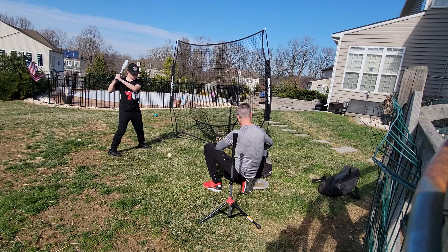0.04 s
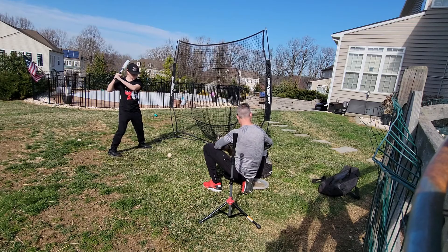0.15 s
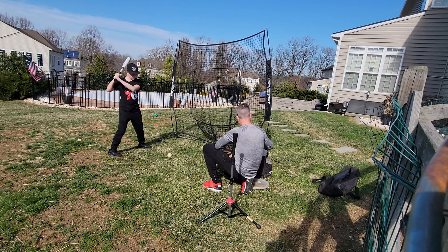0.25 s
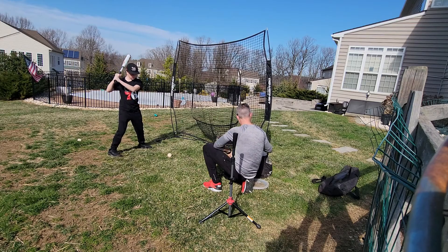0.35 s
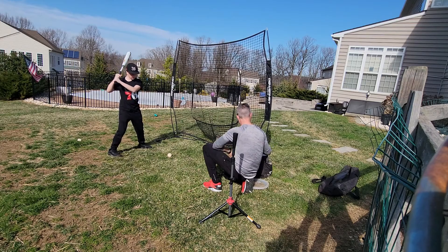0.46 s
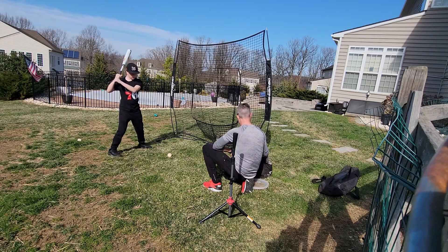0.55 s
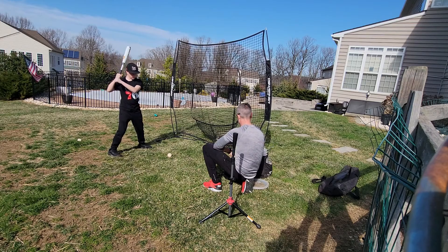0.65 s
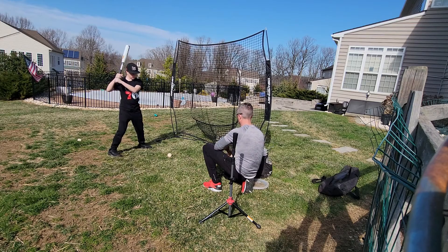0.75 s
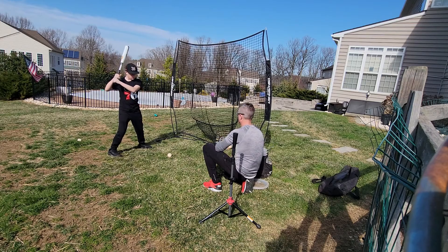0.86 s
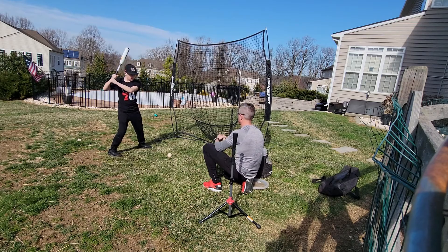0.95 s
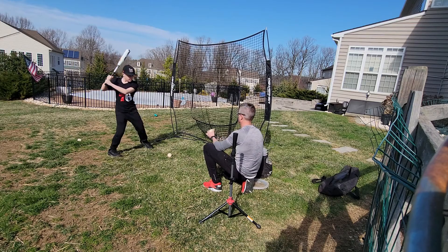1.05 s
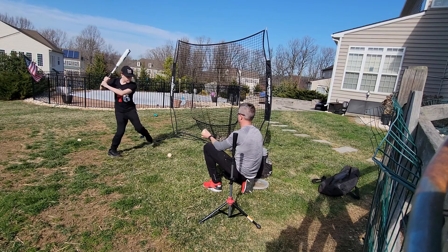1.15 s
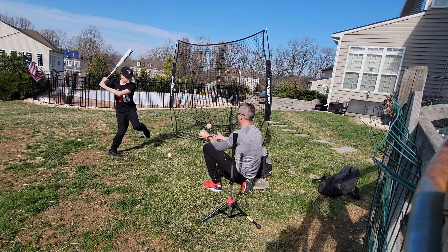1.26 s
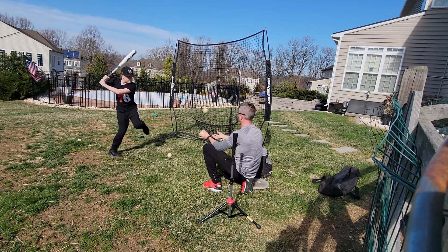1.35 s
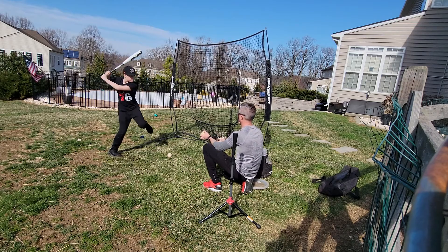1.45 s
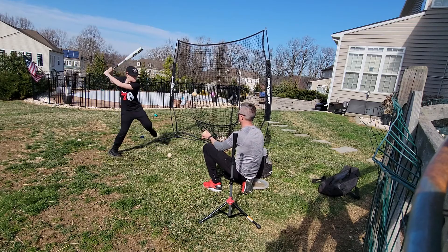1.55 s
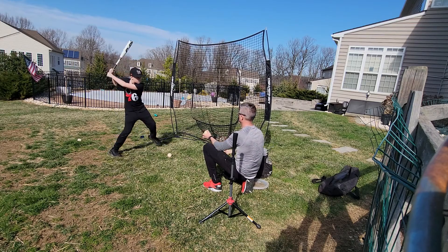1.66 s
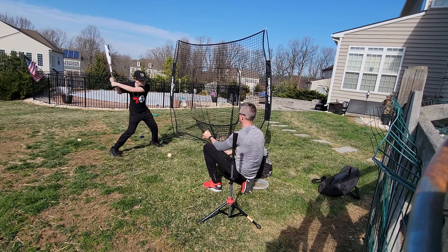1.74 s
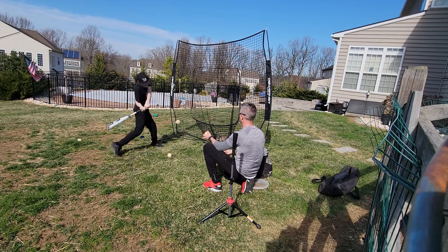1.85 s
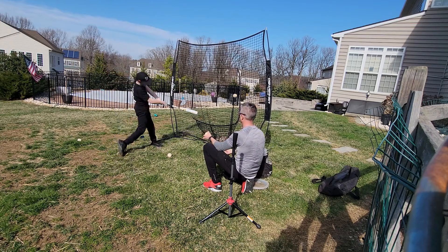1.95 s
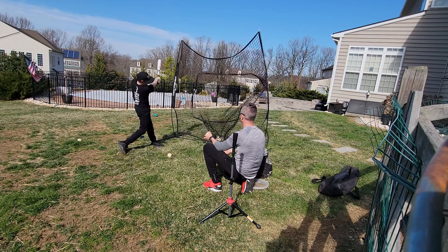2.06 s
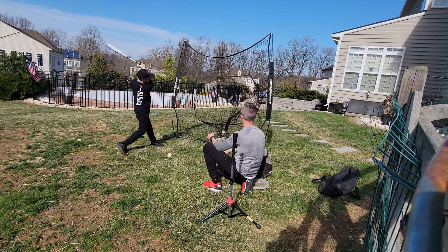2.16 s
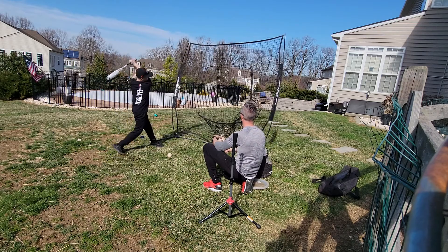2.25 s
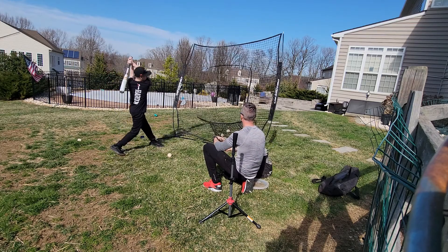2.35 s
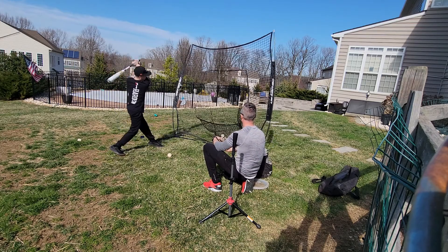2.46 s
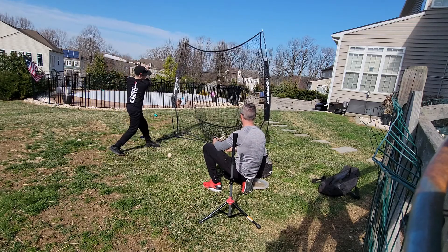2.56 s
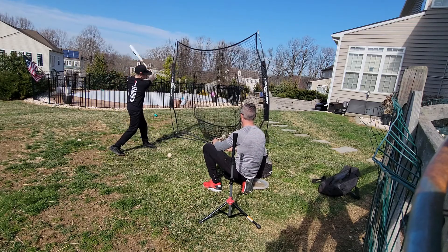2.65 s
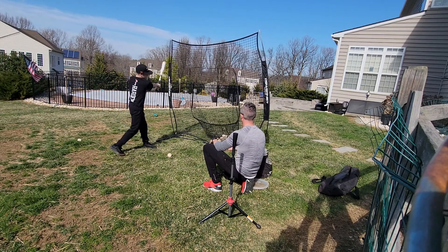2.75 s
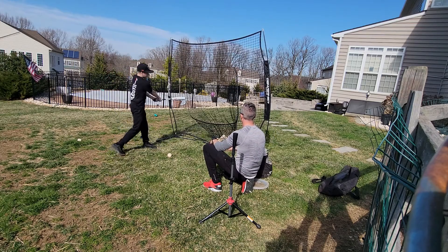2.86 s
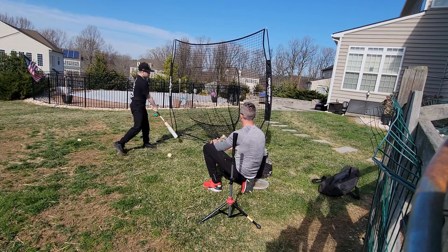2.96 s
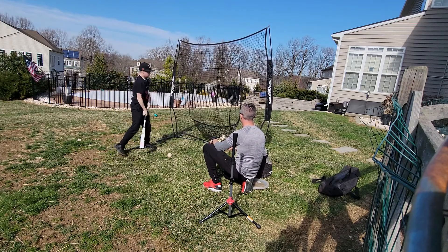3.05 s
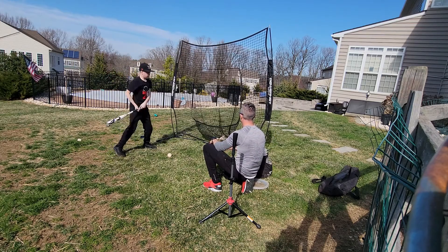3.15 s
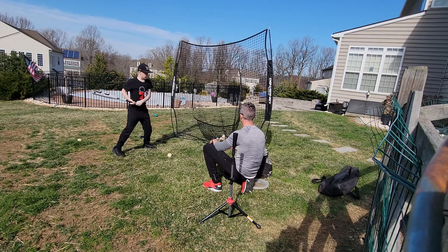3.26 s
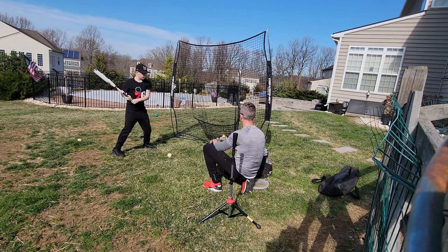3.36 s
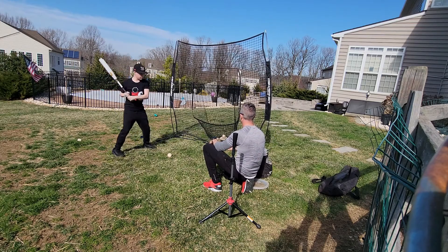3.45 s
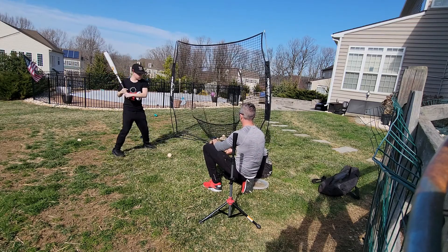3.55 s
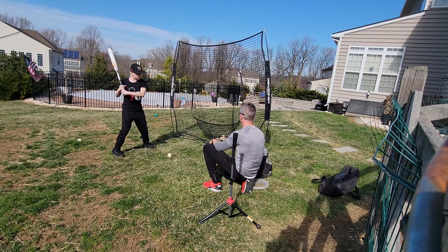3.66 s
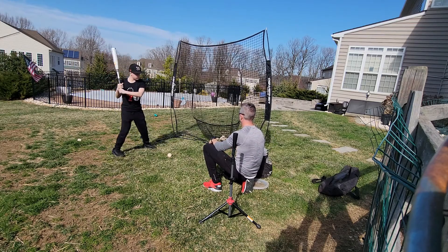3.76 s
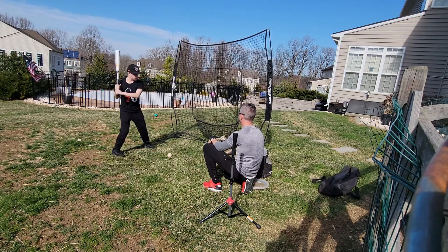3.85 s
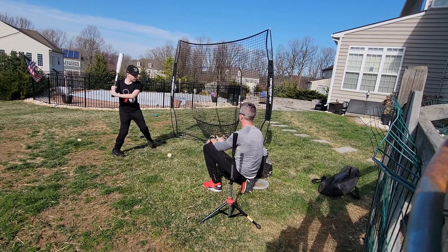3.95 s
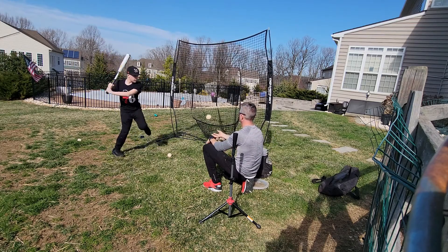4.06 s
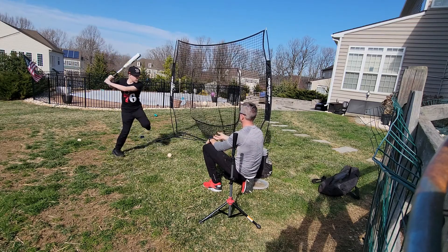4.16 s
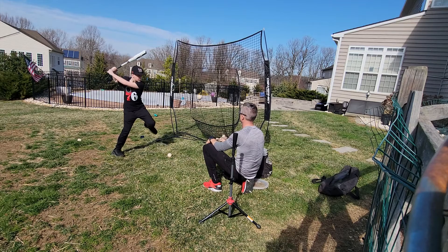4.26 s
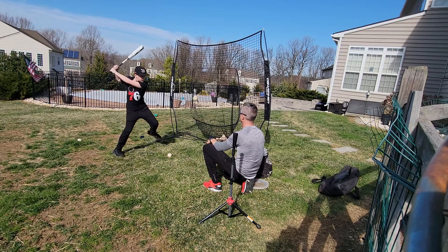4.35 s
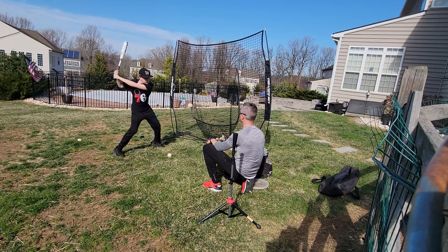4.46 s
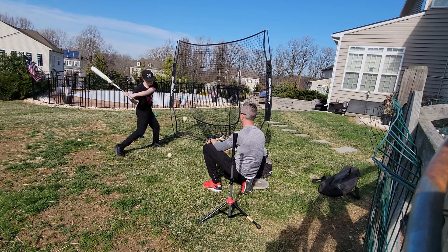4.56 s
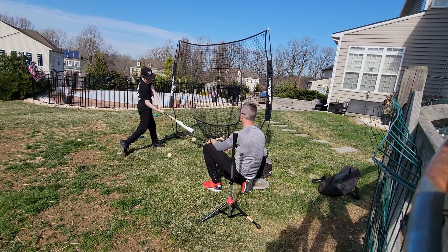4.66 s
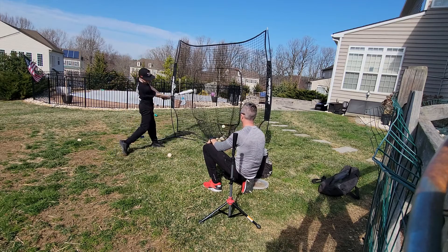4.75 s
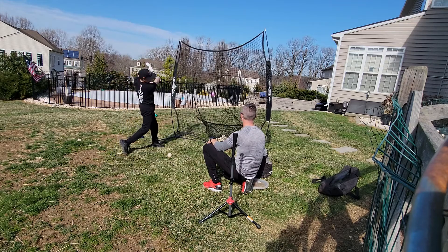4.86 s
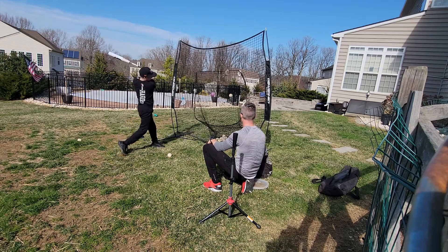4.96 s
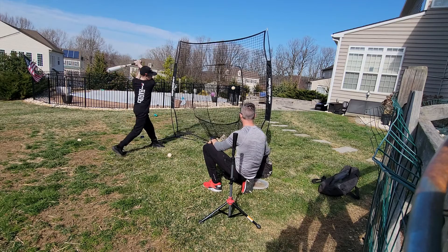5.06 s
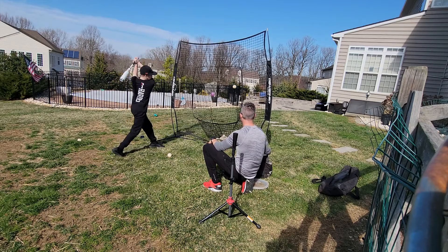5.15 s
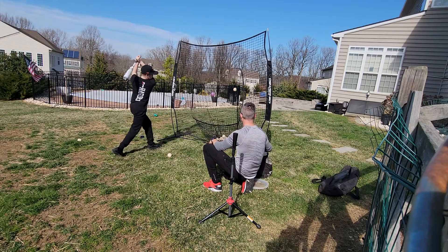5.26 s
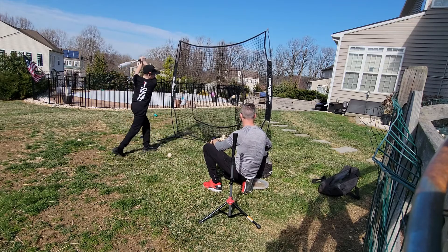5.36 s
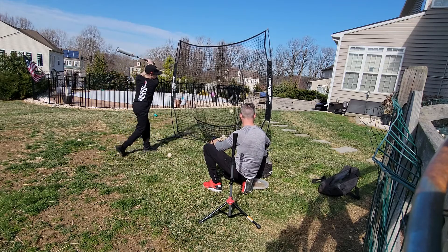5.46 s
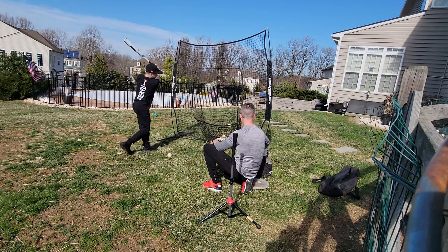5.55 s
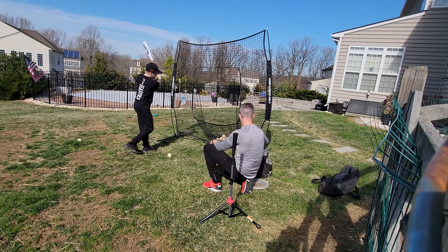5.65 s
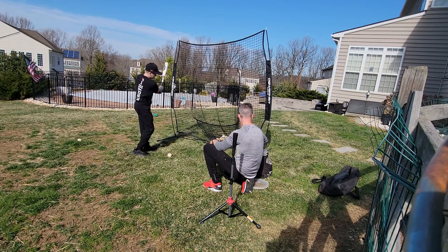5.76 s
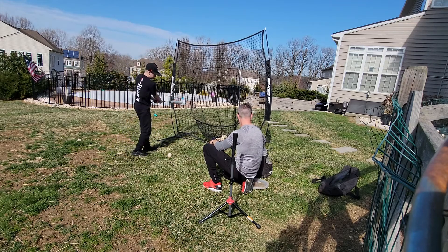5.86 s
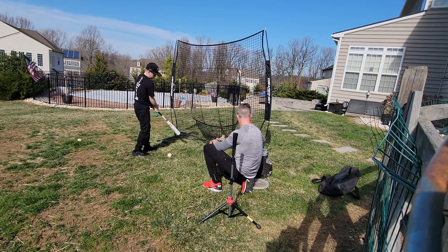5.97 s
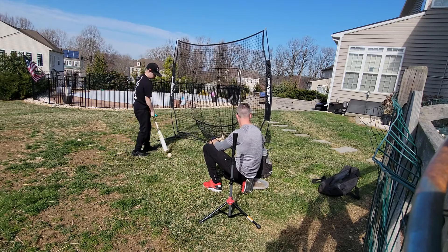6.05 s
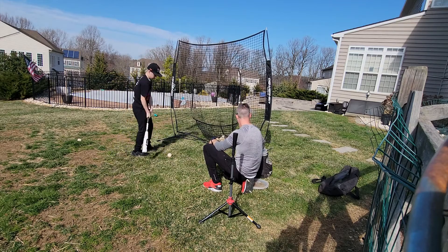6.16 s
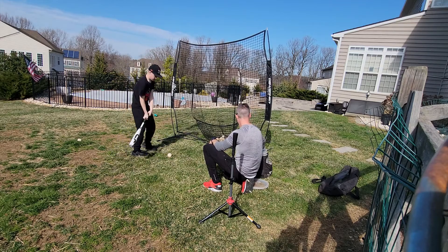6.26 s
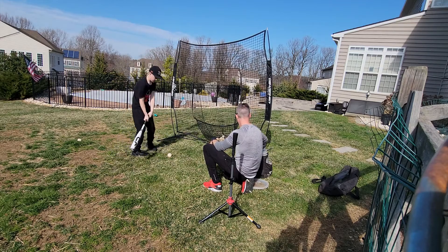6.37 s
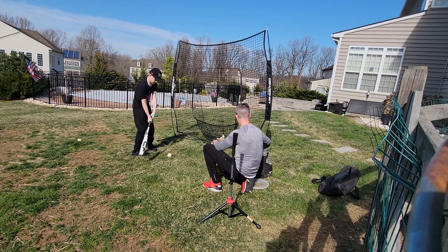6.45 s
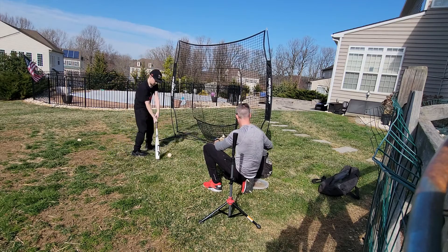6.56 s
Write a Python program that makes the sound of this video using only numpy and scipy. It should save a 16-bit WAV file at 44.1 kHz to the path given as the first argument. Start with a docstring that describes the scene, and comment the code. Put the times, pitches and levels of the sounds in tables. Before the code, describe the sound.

In a quiet backyard, a metal bat pings loudly twice, balls slap into a net, and a small bird whistles steadily behind.

```python
"""In a backyard a hollow metal bat strikes two balls into a practice net.
Each blow is a shaped click, a damped thump and ringing barrel modes that drop as the barrel turns away.
Damped sines knock the net frame, coloured noise swishes the mesh, delays and sparse taps echo the yard.
Gliding sines make a repeated falling whistle and twitters; filtered noise and a wavering sine
make the far traffic and engine, with rustles, ticks and thuds between."""
import sys
import numpy as np
from scipy import signal
from scipy.fft import rfft, irfft
from scipy.io import wavfile
from scipy.ndimage import uniform_filter1d

SR = 44100
rng = np.random.default_rng(int(sys.argv[2]) if len(sys.argv) > 2 else 0)


def wrap_up_sound(samples):
    """Save the sound to the file named by the first command line argument, as 16-bit audio."""
    columns = np.atleast_2d(samples).T
    # keep every value between -1 and 1, then stretch to whole-number steps
    tamed = np.clip(columns, -1, 1)
    steps = np.round(tamed * 32767).astype(np.int16)
    wavfile.write(sys.argv[1], SR, steps)


N = 291496

# Air and far traffic spectrum. Each row: frequency in Hz, relative level in dB per Hz.
AIR_COLOUR = [(12, -39), (30, -10.5), (70, 0.5), (111, -5), (160, -14.5), (300, -17.5), (994, -21),
              (1500, -29.5), (2310, -29.5), (4150, -36), (4700, -47), (7200, -49), (8300, -67),
              (15200, -72), (16500, -77)]
# Air, left-right likeness. Each row: frequency in Hz, correlation (-1 to 1).
AIR_SAME = [(60, 0.63), (130, 0.99), (290, 0.051), (640, -0.55), (1410, -0.53), (3100, -0.11),
            (6820, -0.01), (15000, -0.23)]
# Air balance. Each row: frequency in Hz, left over right in dB.
AIR_BALANCE = [(60, -1.5), (180, -3.5), (550, -1.5), (1650, -6), (4970, 0.5), (15000, 15.5)]
AIR_DB = -51
# Far engine. Each row: time in seconds, mean pitch in Hz, mean level in dB.
ENGINE = [(0, 70.9, -69), (1.401, 74.6, -59), (2.6, 94.8, -73), (3.7, 109.8, -57), (4.4, 122.6, -55),
          (5.5, 124.3, -54), (6.61, 130.8, -51)]

# Whistle onsets. Each row: onset in seconds, level in dB.
WHISTLE_ONSETS = [(.111, -56), (.394, -59), (.677, -58), (.965, -56), (1.256, -56), (1.551, -55.5),
                  (1.844, -55.5), (2.136, -53), (2.43, -56.5), (2.715, -55), (3.012, -54), (3.302, -56),
                  (3.595, -56), (3.89, -55), (4.186, -56), (4.473, -56.5), (5.072, -56), (5.373, -57),
                  (5.66, -55), (5.963, -54.5), (6.265, -57)]
# One whistle's glide. Each row: seconds from onset, nominal pitch in Hz, relative level in dB.
WHISTLE_GLIDE = [(-.013, 4150, -22), (-.010, 3550, -10), (-.006, 2720, -7), (-.001, 2440, -1.5),
                 (.011, 2230, -.5), (.027, 1990, -3.5), (.043, 1850, -8), (.065, 1810, -21)]
# Twitter phrases. Each row: start in seconds, number of strokes, top pitch in Hz, middle level in dB.
PHRASES = [(1.088, 1, 5460, -72), (1.172, 1, 5200, -73), (1.197, 2, 4650, -69), (1.427, 1, 4800, -67),
           (1.464, 2, 4740, -68), (1.648, 2, 4780, -61.5), (1.704, 3, 4870, -62.5), (1.745, 1, 5370, -67),
           (3.1, 1, 4650, -61.5), (3.18, 1, 4650, -66), (3.792, 1, 4920, -61.5), (3.817, 1, 4580, -64),
           (5.145, 1, 5000, -57), (5.71, 1, 4390, -65), (5.948, 1, 5170, -65), (5.972, 1, 5430, -60.5),
           (6.018, 3, 5070, -57), (6.158, 3, 5450, -60.5), (6.228, 3, 5300, -63)]
STROKE_S, STROKE_STEP_S, STROKE_FALL_HZ = .012, .0089, 2000
OUTER_DB = -3  # per stroke away from the phrase's middle
# Level peeps. Each row: start in seconds, pitch in Hz, level in dB.
PEEPS = [(2.249, 3380, -57.5), (2.69, 6000, -69), (3.77, 3370, -67), (4.02, 5800, -67), (4.078, 7100, -74),
         (6.21, 4100, -57)]
PEEP_S = .015
# Near echoes of the birds. Each row: delay in seconds, level in dB.
HEDGE = [(.009, -11), (.021, -10), (.038, -13.5)]
# Phase of left over right for the birds. Each row: frequency in Hz, lead in radians.
BIRD_LEAD = [(0, 0), (2000, 1.6), (5000, -1.3)]

# Cloth, grass and mesh rustles. Each row: middle in seconds, length in seconds, level above 13 kHz in dB.
RUSTLES = [(0.12, 0.15, -77.5), (.42, 0.35, -88), (0.665, 0.1, -84), (1.127, .1, -86), (1.495, .04, -91),
           (1.74, 0.049, -78), (1.89, 0.35, -77), (2.347, .05, -74), (2.4, 0.14, -86), (2.51, 0.066, -81),
           (2.614, 0.38, -79), (3.02, 0.38, -87), (3.95, .1, -87), (4.494, 0.054, -75), (4.69, 0.12, -65),
           (5.13, .08, -76), (5.296, 0.17, -70), (5.384, 0.14, -76), (5.612, .05, -83), (5.68, .05, -80),
           (5.785, 0.054, -71.5), (5.87, 0.068, -81), (6.166, .05, -82), (6.244, 0.24, -78.5),
           (6.33, .03, -81), (6.592, 0.041, -74.5)]
# Rustle spectrum. Each row: frequency in Hz, relative level in dB per Hz.
RUSTLE_COLOUR = [(300, 15), (1000, -2.5), (3000, 5), (5500, -0.5), (7500, -3.5), (8500, -16.5),
                 (11300, -15.5), (12500, -9), (15000, -4.5), (16500, -3)]
# Rustle likeness: frequency in Hz, correlation. Rustle balance: frequency in Hz, left over right in dB.
RUSTLE_SAME, RUSTLE_BALANCE = [(300, .3), (3000, -.019)], [(300, -1.54), (15000, 1.5)]
RUSTLE_EDGE_DB = -14.5  # fall at a rustle's ends
STIR_DB, STIR_SWING_DB = -100, 7.5  # faint stirring under the rustles

# Dry ticks. Each row: start in seconds, level in dB, centre in Hz, t60 in seconds.
TICKS = [(1.64, -46, 2200, 0.067), (1.836, -76, 7600, .03), (2.011, -17.5, 2560, 0.057),
         (2.295, -58, 3640, .02), (2.322, -61, 4200, .02), (2.356, -64, 6860, 0.026),
         (2.639, -47, 1880, 0.07), (4.02, -42, 1810, 0.043), (4.373, -49, 3560, 0.028),
         (4.489, -63.5, 6000, 0.032), (5.108, -58, 4900, 0.029), (5.264, -47, 3600, 0.034),
         (5.689, -66, 5800, 0.031), (6.155, -77, 8000, .03), (6.327, -74, 9000, 0.021),
         (6.588, -62.5, 7940, 0.037)]
# Soft thuds on the lawn. Each row: start in seconds, level in dB, pitch in Hz, t60 in seconds.
THUDS = [(.22, -38, 215, 0.061), (2.507, -38, 104, 0.18), (5.298, -43.5, 203.5, 0.18),
         (5.342, -39, 120.7, 0.098), (5.695, -32, 223, 0.066), (5.696, -35.5, 111, 0.17),
         (5.996, -46.5, 231, 0.16)]

# Ball into the net. Each row: start in seconds, frame knock in dB, mesh swish in dB, swish t60 in seconds.
CATCHES = [(2.008, -43, -35, 0.32), (2.044, -52, -60, .3), (4.7514, -14.5, -21, 0.18),
           (4.7545, -12.5, -27.5, 0.092), (4.7612, -23, -31.5, 0.43), (4.776, -36, -26, 0.075)]
# Swish and knock-click spectrum. Each row: frequency in Hz, relative level in dB per Hz.
SWISH_COLOUR = [(35, -35), (60, -8), (342, -9), (442, -17.5), (600, -2), (874, -10), (1010, -7.5),
                (2460, -6), (9840, -32.5), (15000, -33), (16500, -35.5)]
# Mesh likeness. Each row: frequency in Hz, correlation.
MESH_SAME = [(100, -.051), (600, -.25), (2000, -.54), (8000, .23)]
# Mesh balance. Each row: frequency in Hz, left over right in dB.
MESH_BALANCE = [(100, -11.0), (10000, 3.0)]
# Frame pole modes. Each row: frequency in Hz, relative level in dB, t60 in seconds.
FRAME_MODES = [(249, -20, 0.064), (344.6, -20.5, 0.17), (546, -13.5, 0.121), (593, -15, 0.16),
               (790, -4, 0.041), (1011, -6.5, 0.071), (1120, 0.5, 0.044), (1313, -5, 0.031),
               (1550, -15.5, 0.14), (1940, -17.5, 0.048), (2460, -20, 0.021), (4500, -17, 0.015)]
# Phase of left over right for the frame. Each row: frequency in Hz, lead in radians.
FRAME_LEAD = [(0, -4.4), (300, 1.24), (1000, 0.77), (2330, 0.5), (3010, 5), (4390, 0), (16600, -4)]

# Yard reverberation. Each row: frequency in Hz, t60 in seconds.
YARD_T60 = [(100, 0.74), (500, 0.37), (1500, 0.34), (4000, 0.49), (9000, 0.33), (16000, 1)]
# Flat walls. Each row: delay in seconds, echo level in dB.
WALLS = [(.027, -24), (.061, -34), (.096, -38), (0.111, -34)]
# Scattered crack spectrum. Each row: frequency in Hz, relative level in dB per Hz.
SCATTER_COLOUR = [(60, -14), (300, 10.5), (900, 1), (2500, -1), (4000, -0.5), (6000, -14.5), (9000, -26.5),
                  (15000, -17), (16500, -32)]
# Scatter likeness. Each row: frequency in Hz, correlation.
SCATTER_SAME = [(100, .0042), (600, -.62), (3000, .26), (8000, .097)]
# Scatter balance. Each row: frequency in Hz, left over right in dB.
SCATTER_BALANCE = [(100, -5.0), (10000, 9.5)]
LUMPS_DB = -.5  # unevenness of the slaps
CLATTER_PER_S, CLATTER_DB, CLATTER_T60_S = 140, -21, .44  # pings from posts, slats and corners

# Bat on ball. Each row: contact in seconds, crack in dB, ball thump in dB, upper modes in dB,
# scattered crack in dB, factor on the upper modes' t60, slow overtone in dB, left over right in dB.
BLOWS = [(1.949, -9.5, -7.5, -9.5, -25, 0.28, -59, 0.3), (4.7021, -20.5, -10.5, -4, -24.5, 1.05, -49, 2)]
# Barrel after each blow. Each row: facing ring in dB, seconds from contact to turned away,
# cross ring's glance in dB, lingering ring in dB.
SWINGS = [(-8.5, 0.052, -34, -48), (-8.5, 0.049, -35, -53)]
# Crack spectrum. Each row: frequency in Hz, relative level in dB per Hz.
CRACK_COLOUR = [(35, -55), (60, -25.5), (1010, 9), (1470, -32), (2090, -26), (3260, 6.5), (3840, -5),
                (5470, -10.5), (7600, -46), (11300, -15), (16500, -23.5)]
# Squashed ball. Each row: frequency in Hz, relative level in dB, t60 in seconds.
THUMP_MODES = [(830, -7, 0.039), (1024, -0.5, 0.013)]
# Upper barrel modes. Each row: frequency in Hz, relative level in dB, t60 in seconds before the blow's factor.
UPPER_MODES = [(552, -15.5, 0.072), (2450, -20.5, 0.04), (2546, -9, 0.19), (3176, -23.5, 0.57),
               (3440, -27, 0.088), (3888, -10.5, 0.037), (3965, -23, 0.026), (5020, -23, 0.027)]
# Phase of left over right for the bat. Each row: frequency in Hz, lead in radians.
BAT_LEAD = [(0, 0.3), (250, 0.8), (600, 2.1), (1370, 2.3), (2540, 1.9), (3900, 3.9), (5430, 6.7),
            (16600, 8.5)]
BARREL_HZ, CROSS_HZ, SLOW_HZ = 1371, 1480, 2705
THUMP_LATE_S, UPPER_LATE_S = .001, .0008
BARREL_T60_S, SNAP_T60_S, SLOW_T60_S = .71, .06, 1.49
TURN_DB, TURN_POWER = -10, 9.8  # fall at the turn, and how abrupt it is
GLANCE_S, GLANCE_HALF_WIDTH_S, GLANCE_LEAD_RAD = .077, .02, .6
AWAY_DB, AWAY_T60_S, LINGER_T60_S, CROSS_LINGER_DB = -35, .11, 2.32, 0  # heard from behind


def gain_of(db):
    """Decibels to an amplitude factor."""
    return 10 ** (np.asarray(db) / 20)


def evened(x):
    """Scales to rms 1."""
    return x / np.sqrt(np.mean(x ** 2) + 1e-20)


def read(points, hz):
    """Interpolates a (Hz, value) table on a log-frequency axis."""
    f, value = np.transpose(points)
    return np.interp(np.log(hz + 1), np.log(f + 1), value)


def add(mix, start_s, sound):
    """Mixes a sound in at a time, cut off at the end of the mix."""
    part = mix[..., round(start_s * SR):][..., :sound.shape[-1]]
    part += sound[..., :part.shape[-1]]


def high_pass(x, hz, order):
    """Butterworth low cut."""
    return signal.lfilter(*signal.butter(order, hz, "high", fs=SR), x)


def smooth_twice(x, size, axis=-1):
    """Two running means, a near-triangular smoothing."""
    return uniform_filter1d(uniform_filter1d(x, size=size, axis=axis), size=size, axis=axis)


def wander(width):
    """Slow random drift of rms 1, smoothed over width samples."""
    return evened(smooth_twice(rng.standard_normal(N), width))


def noise(colour, same, balance, size, patchy_db):
    """Two partly alike channels of coloured noise with drifting spectral patches, rms 1."""
    hop, hz = size // 4, np.fft.rfftfreq(size, 1 / SR)
    a, b, c, d, patches = rng.standard_normal((N // hop + 5, len(hz), 5)).T
    patches = uniform_filter1d(uniform_filter1d(patches, size=9, axis=0), size=9, axis=1)
    patches = evened(patches)
    same = np.clip(read(same, hz), -1, 1)[:, None]
    left = a + 1j * b
    right = same * left + np.sqrt(1 - same ** 2) * (c + 1j * d)
    half_db = read(balance, hz)[:, None] / 2
    level_db = read(colour, hz)[:, None] + np.array([half_db, -half_db]) + patchy_db * patches
    z = np.array([left, right]) * gain_of(level_db)
    return evened(signal.istft(z, nperseg=size, noverlap=size - hop)[1][:, :N])


def click(colour):
    """The causal (minimum-phase) pulse of a spectrum, peak 1."""
    log_gain = np.log(gain_of(read(colour, abs(np.fft.fftfreq(4096, 1 / SR)))))
    pulse = np.fft.ifft(np.exp(np.conj(signal.hilbert(log_gain)))).real[:2048]
    return pulse / abs(pulse).max()


def ring(modes):
    """Exponentially decaying sines struck together."""
    t = np.arange(SR // 2) / SR
    return sum(gain_of(db - 60 * t / t60_s) * np.sin(2 * np.pi * hz * t) for hz, db, t60_s in modes)


def ports(x, lead, pan_db):
    """One source on two microphone ports: a phase lead by frequency and a left-over-right balance."""
    half_rad = np.interp(np.fft.rfftfreq(N, 1 / SR), *np.transpose(lead)) / 2
    shifted = rfft(x) * np.exp(1j * np.array([half_rad, -half_rad]))
    return irfft(shifted, N) * gain_of([[pan_db / 2], [-pan_db / 2]])


def air():
    """Broad, bass-heavy noise of air and far traffic."""
    return gain_of(AIR_DB) * noise(AIR_COLOUR, AIR_SAME, AIR_BALANCE, size=2048, patchy_db=1.5)


def drone():
    """A far engine: one low sine that creeps upward and wavers in pitch and level."""
    at_s, hz, db = np.transpose(ENGINE)
    t = np.arange(N) / SR
    pitch_hz = np.interp(t, at_s, hz) * (1 + .02967 * wander(2500))
    level = gain_of(np.interp(t, at_s, db) + 1.7 * wander(2500))
    note = level * np.sin(2 * np.pi * np.cumsum(pitch_hz) / SR)
    return note * gain_of([[-.8], [.8]])


def glide(db, start_hz, end_hz, length_s):
    """One soft-edged sine note whose glide speeds up."""
    hz = start_hz + (end_hz - start_hz) * np.linspace(0, 1, round(length_s * SR)) ** 1.3
    return gain_of(db) * np.hanning(len(hz)) * np.sin(2 * np.pi * np.cumsum(hz) / SR)


def whistles(out):
    """The same falling sine at each onset, its pitch scaled slightly by chance."""
    at_s, hz, shape_db = np.transpose(WHISTLE_GLIDE)
    t = np.arange(at_s[0], at_s[-1], 1 / SR)
    for s, db in WHISTLE_ONSETS:
        turns = np.cumsum(np.interp(t, at_s, hz)) * rng.normal(1, .0073) / SR
        add(out, s + at_s[0], gain_of(db + np.interp(t, at_s, shape_db)) * np.sin(2 * np.pi * turns))


def twitters(out):
    """Runs of quick downward glides, softer toward the ends, and level peeps."""
    for s, strokes, top_hz, phrase_db in PHRASES:
        for k in range(strokes):
            stroke_db = phrase_db + OUTER_DB * abs(k - (strokes - 1) / 2)
            stroke = glide(stroke_db, top_hz, top_hz - STROKE_FALL_HZ, STROKE_S)
            add(out, s + k * STROKE_STEP_S, stroke)
    for s, hz, db in PEEPS:
        add(out, s, glide(db, hz, hz, PEEP_S))


def birds():
    """Near-sine whistles and twitters with near echoes."""
    out = np.zeros(N)
    whistles(out)
    twitters(out)
    out *= gain_of(1.8 * wander(150))  # air and leaves make the notes shimmer
    return out + sum(gain_of(db) * np.roll(out, round(late_s * SR)) for late_s, db in HEDGE)


def rustle():
    """Cloth, grass and mesh: bright hiss in short swells over a faint, restless stirring."""
    t = np.arange(N) / SR
    level = gain_of(STIR_DB + STIR_SWING_DB * wander(2000))
    for s, length_s, db in RUSTLES:
        level = level + gain_of(db + RUSTLE_EDGE_DB * abs(t - s) / (length_s / 2))
    hiss = noise(RUSTLE_COLOUR, RUSTLE_SAME, RUSTLE_BALANCE, size=256, patchy_db=2.0)
    top = high_pass(hiss.mean(axis=0), 13000, 4)
    return level * hiss / top.std()


def ticks():
    """Decaying puffs of band-passed noise, each opened by a snap of opposite sign in the ports."""
    out, t = np.zeros((2, N)), np.arange(SR // 2) / SR
    snap = np.outer([9, -9], t < .5 / SR)
    for s, db, hz, t60_s in TICKS:
        band = signal.butter(2, [hz * .75, min(hz * 1.35, 20000)], "band", fs=SR)
        puff = rng.standard_normal((2, len(t))) + snap
        add(out, s, gain_of(db - 60 * t / t60_s) * signal.lfilter(*band, puff))
    return out


def thuds():
    """Soft lawn thuds: low damped sines with a short rise."""
    out, t = np.zeros((2, N)), np.arange(SR // 2) / SR
    rise = np.minimum(t / .002, 1)
    for s, db, hz, t60_s in THUDS:
        add(out, s, gain_of(db - 60 * t / t60_s) * np.sin(2 * np.pi * hz * t) * rise)
    return out


def mesh():
    """The net swishes as it swallows the ball: decaying coloured noise."""
    t, level = np.arange(SR // 2) / SR, np.zeros(N)
    rise = np.minimum(t / .00202, 1)
    for s, _, swish_db, t60_s in CATCHES:
        add(level, s, gain_of(swish_db - 60 * t / t60_s) * rise)
    return level * noise(SWISH_COLOUR, MESH_SAME, MESH_BALANCE, size=256, patchy_db=5.5)


def frame():
    """The ball knocks the net's poles: struck modes and a click."""
    out = np.zeros(N)
    for s, knock_db, _, _ in CATCHES:
        add(out, s, gain_of(knock_db) * ring(FRAME_MODES))
        add(out, s, gain_of(knock_db - 3.0) * click(SWISH_COLOUR))
    return out * gain_of(2.5 * wander(150))  # loose joints rattle


def yard(x):
    """Echoes off houses and fences: sparse taps of random sign, each band dying at its own speed."""
    taps = np.zeros((2, SR))
    at = np.arange(300, SR - 40, 40) + rng.integers(0, 40, (2, (SR - 301) // 40))
    np.put_along_axis(taps, at, rng.choice([-1., 1.], at.shape), 1)
    hz, t, z = signal.stft(taps, SR, nperseg=256)
    decay = gain_of(-60 * t / read(YARD_T60, hz)[:, None])
    tail = signal.istft(z * decay, SR, nperseg=256)[1]
    return signal.fftconvolve(x[None], tail / np.linalg.norm(tail[0]), axes=1)[:, :N]


def scatter():
    """The crack returns diffusely, in uneven slaps, from grass, fence and net."""
    t, level = np.arange(SR // 2) / SR, np.zeros(N)
    for s, _, _, _, db, *_ in BLOWS:
        add(level, s, gain_of(db - 2 - 60 * t / .048) + gain_of(db - 2.5 - 60 * t / .33))
    level *= gain_of(LUMPS_DB * wander(120))
    return level * noise(SCATTER_COLOUR, SCATTER_SAME, SCATTER_BALANCE, size=256, patchy_db=3)


def contact(crack_db, thump_db, upper_db, lasting, facing):
    """Crack at once; the squashed ball and the barrel's upper modes answer just after."""
    blow = np.zeros(SR)
    upper = ring(np.array(UPPER_MODES) * [1, 1, lasting])
    upper *= (facing + gain_of(AWAY_DB / 2))[:SR // 2]
    add(blow, 0, gain_of(crack_db) * click(CRACK_COLOUR))
    add(blow, THUMP_LATE_S, gain_of(thump_db) * ring(THUMP_MODES))
    add(blow, UPPER_LATE_S, gain_of(upper_db) * upper)
    return blow


def reflections(s, blow, glance_db):
    """Walls, clattering posts and the cross ring's glance off a wall."""
    out, t = np.zeros(N), np.arange(SR) / SR
    snap = blow * gain_of(-60 * t / SNAP_T60_S)  # a moving barrel lines up with each surface only briefly
    for late_s, wall_db in WALLS:
        add(out, s + late_s, gain_of(wall_db) * snap)
    posts = (rng.random(SR) < CLATTER_PER_S / SR) * rng.standard_normal(SR)
    posts *= gain_of(CLATTER_DB - 60 * t / CLATTER_T60_S)
    add(out, s + .008, signal.fftconvolve(posts, high_pass(snap, 1800, 4)))
    swell_db = glance_db - 10 * ((t - GLANCE_S) / GLANCE_HALF_WIDTH_S) ** 2
    add(out, s, gain_of(swell_db) * np.sin(2 * np.pi * CROSS_HZ * t))
    return out


def lingering(facing, rise, ring_db, linger_db, slow_db):
    """The turned barrel heard over many paths, so level and pitch flutter."""
    t = np.arange(SR) / SR
    away = gain_of(ring_db + AWAY_DB - 60 * t / AWAY_T60_S)
    behind = (1 - facing) * (away + gain_of(linger_db - 60 * t / LINGER_T60_S))
    flutter = np.array([wander(500)[:SR] for _ in range(4)])
    # phase in radians per Hz of pitch
    barrel, cross = (2 * np.pi * np.cumsum(1 + .00977 * f) / SR for f in flutter[:2])
    rings = behind * gain_of(5.0 * flutter[2]) * np.sin(BARREL_HZ * barrel)
    rings += behind * gain_of(CROSS_LINGER_DB + 4.6 * flutter[3]) * np.sin(CROSS_HZ * cross)
    slow = gain_of(slow_db - 60 * t / SLOW_T60_S + 5.0 * flutter[3])
    return rings + rise * slow * np.sin(SLOW_HZ * barrel)


def bat():
    """Contact, then barrel rings that drop as the barrel turns away."""
    out, t = np.zeros((2, N)), np.arange(SR) / SR
    rise = np.minimum(t / .0037, 1)
    for blow_row, swing_row in zip(BLOWS, SWINGS):
        s, crack_db, thump_db, upper_db, _, lasting, slow_db, pan_db = blow_row
        ring_db, turned_s, glance_db, linger_db = swing_row
        near, tail = np.zeros((2, N))
        facing = gain_of(TURN_DB * np.minimum(t / turned_s, 3) ** TURN_POWER)
        blow = contact(crack_db, thump_db, upper_db, lasting, facing)
        add(near, s, blow)
        barrel_level = rise * facing * gain_of(ring_db - 60 * t / BARREL_T60_S)
        add(near, s, barrel_level * np.sin(2 * np.pi * BARREL_HZ * t))
        add(tail, s, lingering(facing, rise, ring_db, linger_db, slow_db))
        paths = gain_of(3.0 * np.array([wander(700), wander(700)]))
        out += ports(near, BAT_LEAD, pan_db)
        out += paths * ports(tail, BAT_LEAD, pan_db)
        out += ports(reflections(s, blow, glance_db), [(0, GLANCE_LEAD_RAD)], 0)
    return out


def scene():
    """All sources on the two ports, with the yard's echoes."""
    song = birds()
    knock = high_pass(frame(), 90, 2)
    ping = high_pass(bat(), 150, 2)  # the bat's sounds carry little bass
    direct = ports(song, BIRD_LEAD, pan_db=-4.0) + ports(knock, FRAME_LEAD, pan_db=3.0) + ping
    echoes = yard(gain_of(-15.0) * ping[0] + gain_of(-7.0) * knock + gain_of(-8.5) * song)
    background = air() + drone() + rustle() + ticks() + thuds()
    return background + mesh() + scatter() + echoes + direct


def record(dry):
    """Close ports hear the bass alike; low cut, soft overload near full scale, then the band limit."""
    mid, side = (dry[0] + dry[1]) / 2, (dry[0] - dry[1]) / 2
    side = side - .5 * signal.filtfilt(*signal.butter(2, 170, fs=SR), side)
    cut = high_pass([mid + side, mid - side], 28, 1)
    held = np.tanh(cut / 1.187) * 1.365
    band_limit = signal.firwin(511, 15900, window=("kaiser", 9), fs=SR)
    return signal.oaconvolve(held, band_limit[None], "same")


dry = scene()
out = record(dry)
wrap_up_sound(out)
```